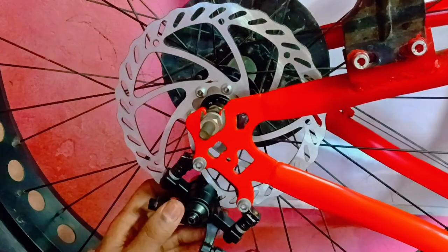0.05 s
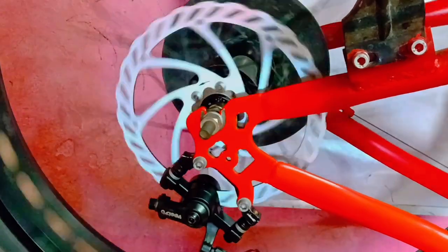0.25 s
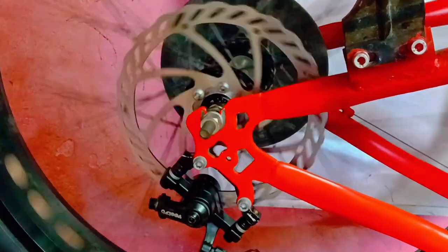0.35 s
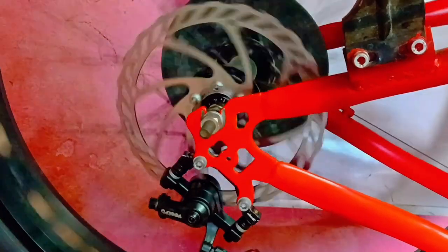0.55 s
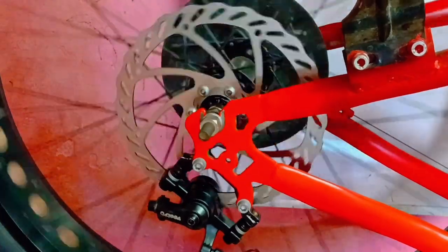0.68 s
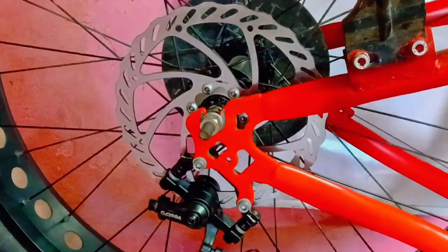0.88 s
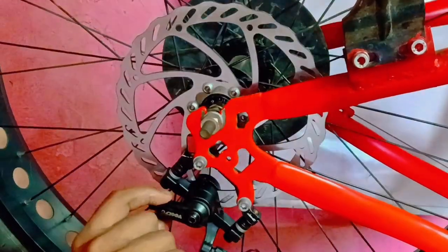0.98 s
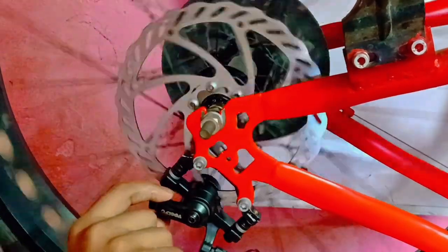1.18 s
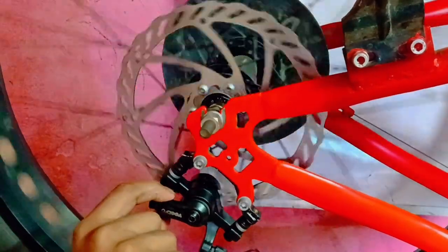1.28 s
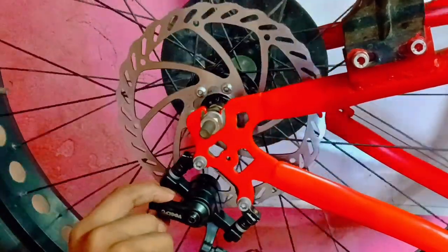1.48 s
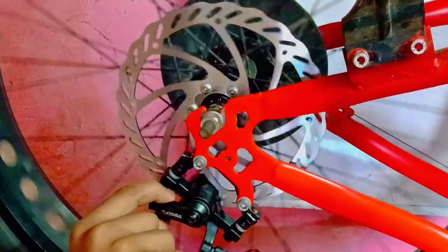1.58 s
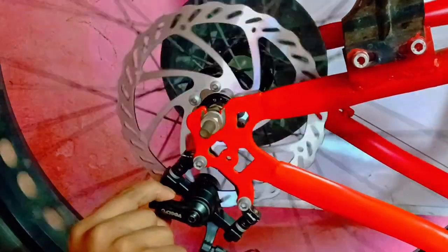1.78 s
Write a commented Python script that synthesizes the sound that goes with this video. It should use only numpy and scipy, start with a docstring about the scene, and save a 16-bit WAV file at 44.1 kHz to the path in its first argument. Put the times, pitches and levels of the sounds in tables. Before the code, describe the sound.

A bicycle disc brake squeaks in short, high, wavering bursts as its pads scrape the spinning disc and click. It lets go briefly, then squeaks and scrapes again more softly, close up in a quiet room.

```python
"""In a quiet room, close to a bicycle, the disc brake is squeezed, let go and squeezed again.
Its pads stick to the spinning steel disc and slip free about 1000-1700 times a second, which makes
short gliding squeaks with bright overtones. In between, the pads scrape grittily, grab with a rasp
and make the disc sing dully. The pads and their clamp (the caliper) click, and once the disc
grazes a released pad with a faint chirp."""
import sys
import numpy as np
from scipy import signal
from scipy.fft import rfft, irfft
from scipy.io import wavfile
from scipy.ndimage import uniform_filter1d

SR = 44100
rng = np.random.default_rng(int(sys.argv[2]) if len(sys.argv) > 2 else 0)


def inscribe(sig):
    """Save sig as 16-bit PCM at rate SR to the path in sys.argv[1].

    A 1-D sig is mono; a 2-D sig holds one channel per row.
    Samples are clipped to [-1, 1] before scaling.
    """
    pcm = np.round(np.clip(np.atleast_2d(sig).T, -1, 1) * 32767)
    wavfile.write(sys.argv[1], SR, pcm.astype(np.int16))


N = 81585

# The tone of the room, the scraping and the clicks. Each row: frequency in Hz, gain in dB.
ROOM_TONE = [(100, -21), (330, -23), (700, -2), (1450, 2), (2000, -5.5), (8000, -18)]
SCRAPE_TONE = [(330, -24.5), (700, -5.5), (1350, 2), (2600, 0.5), (4500, -3), (12500, -5.5), (15500, -5)]
CLICK_TONE = [(250, -40), (700, -24.5), (1350, -4.5), (4500, -8), (6000, -0.5), (8500, -4.5), (11300, -2),
              (15500, -11.5)]
# Light touches that make the disc sing. Each row: start in seconds, end in seconds, level in dB.
LIGHT_RUBS = [(0.4, 0.569, -45), (1.235, 1.272, -42), (1.354, 1.423, -55)]
# How loudly the pads drag on the disc. Each row: time in seconds, level in dB.
SCRAPE_LEVELS = [(.075, -70.5), (.079, -42.5), (.101, -57), (.109, -45.5), (.365, -43), (.382, -57),
                 (.401, -63), (.406, -37), (.48, -45.5), (.56, -41.5), (.76, -50.5), (.82, -68.5),
                 (1.13, -68), (1.16, -43.5), (1.21, -45), (1.27, -37.5), (1.31, -40), (1.33, -63),
                 (1.39, -50.5), (1.495, -70), (1.515, -45), (1.533, -58.5), (1.545, -45), (1.68, -46.5),
                 (1.703, -66.5), (1.728, -68), (1.742, -52.5), (1.85, -52.5)]
# Knocks of the pads and caliper. Each row: start in seconds, level in dB.
KNOCKS = [(.009, -49.5), (0.404, -21), (.415, -22.5), (.448, -28.5), (.499, -36), (0.914, -46.5),
          (0.924, -47), (.983, -57.5), (1.232, -30.5), (1.242, -36), (1.74, -44.5), (1.757, -40.5),
          (1.821, -44)]
# Moments when the pads grab. Each row: start in seconds, ringing frequency in Hz, level in dB.
GRABS = [(0.553, 2130, -33.5), (0.56, 5830, -30.5), (.713, 4800, -42.5), (0.785, 2160, -47.5),
         (1.157, 2460, -37), (1.255, 4500, -32.5), (1.51, 3130, -40), (1.56, 1870, -47.5),
         (1.576, 6360, -37), (1.676, 4160, -46)]
# How the brake rings after a slip, low and high. Each row: frequency in Hz, gain in dB.
LOW_TONE = [(800, -27.5), (1300, -1.5), (2700, 2.5), (4700, 0.5), (5600, -39.5)]
HIGH_TONE = [(3700, -25), (5100, -1.5), (6500, 1), (8000, -7.5), (12000, -14.5), (15500, -25)]
# The squeaks. Each row: low and high ringing frequencies in Hz, gain of the top treble in dB,
# roughness from 0 to 1, and a path. Each row of a path: time in seconds, slips per second,
# level of the low part in dB, level of the high part in dB.
PAD_SQUEAKS = [ (2500, 5800, 11.5, 0.28, [(.226, 1386, -27.5, -26.5), (.234, 1232, -31, -47),
               (.241, 1257, -32.5, -52), (.244, 1337, -30, -20), (.253, 1428, -26.5, -25)]),
               (2310, 7170, 14.5, .16, [(.292, 1280, -22.5, -64), (.297, 1347, -33.5, -18),
               (.308, 1317, -24.5, -16)]), (2310, 6200, 4, 0.46, [(.326, 1190, -28.5, -42),
               (.333, 1238, -32.5, -21.5), (.339, 1258, -24.5, -55), (.360, 1292, -30.5, -37.5),
               (.370, 1354, -42, -58)]), (2930, 6300, -0.5, 0.18, [(.564, 1477, -26.5, -47),
               (.580, 1520, -22.5, -34), (.585, 1679, -30, -24), (.596, 1734, -29, -28),
               (.602, 1510, -25, -45), (.609, 1365, -27, -21.5), (.622, 1466, -28, -22),
               (.634, 1622, -29.5, -13), (.648, 1680, -29.5, -33.5), (.668, 1570, -19, -42),
               (.674, 1372, -26.5, -54), (.683, 1386, -20.5, -54)]),
               (2640, 6690, 5, 0.07, [(.692, 1308, -29, -24.5), (.701, 1313, -30.5, -24)]),
               (2810, 6200, 9, 0.32, [(.715, 1287, -34, -45), (.730, 1300, -32.5, -70),
               (.741, 1311, -36.5, -62), (.755, 1354, -34, -76), (.769, 1277, -46.5, -74),
               (.790, 1190, -46, -69)]), (4200, 7900, 11.5, 0.27, [(1.166, 1343, -43.5, -35),
               (1.183, 1308, -42.5, -71), (1.190, 1350, -38.5, -63), (1.196, 1374, -23, -34),
               (1.200, 1393, -25.5, -53)]), (4060, 7630, -15, 0.42, [(1.219, 1254, -47, -27.5),
               (1.226, 1358, -28.5, -31)]), (4320, 7560, 4.5, 0.23, [(1.262, 1325, -35, -62),
               (1.271, 1324, -40.5, -31), (1.281, 1318, -42.5, -50.5), (1.293, 1315, -41, -35.5),
               (1.318, 1343, -44, -57)]), (3080, 7500, 6.5, 0.87, [(1.515, 1170, -36.5, -33.5),
               (1.524, 1192, -39, -35.5)]), (4800, 7400, 6, 0.46, [(1.540, 1196, -37, -31),
               (1.544, 1170, -38, -49), (1.550, 1226, -46, -41), (1.556, 1138, -32.5, -43),
               (1.562, 1150, -43, -54)]), (4230, 7300, 1, 0.38, [(1.578, 1200, -32, -38),
               (1.595, 1128, -31, -54), (1.600, 1175, -55, -42)]),
               (1860, 6400, -8, 0.3, [(1.652, 971, -36.5, -74), (1.667, 984, -48.5, -50)]), ]


def amp(db):
    """Turn decibels into a number to multiply by."""
    return 10 ** (np.asarray(db) / 20)


def unit(x):
    """Scale a signal so that its typical size (rms) is 1."""
    return x / np.std(x)


def even(x, size=200):
    """Hold the strength near 1 all along, averaging over size samples."""
    power = uniform_filter1d(uniform_filter1d(x * x, size), size)
    return x / np.sqrt(power + 1e-12)


def wander(hz):
    """A smooth random wobble that turns about hz times a second."""
    size = max(int(SR / hz), 1)
    return unit(uniform_filter1d(uniform_filter1d(rng.standard_normal(N), size), size))


def colour(x, points, size=4096):
    """Shape a sound's tone with a table of frequencies and gains."""
    hz, db = np.array(points).T
    freqs = np.maximum(np.arange(size // 2 + 1) * SR / size, 1)
    gain = amp(np.interp(np.log(freqs), np.log(hz), db))
    # these steps make the filter ring only after a sound, never before it
    cepstrum = irfft(np.log(gain))
    cepstrum[1:size // 2] *= 2
    cepstrum[size // 2 + 1:] = 0
    ring = irfft(np.exp(rfft(cepstrum)))
    return signal.fftconvolve(x, ring)[:len(x)]


def band(hz, width_hz):
    """Noise that rings around one frequency."""
    b, a = signal.iirpeak(hz, hz / width_hz, fs=SR)
    return unit(signal.lfilter(b, a, signal.lfilter(b, a, rng.standard_normal(N))))


def gate(t, start, end, rise_s=0.0035, fall_s=0.009):
    """Fade in just before start and out just after end."""
    return np.clip(np.minimum((t - start) / rise_s, (end - t) / fall_s) + 1, 0, 1) ** 2


def room(level_db=-66):
    """The faint, steady hush of the room."""
    return amp(level_db) * unit(colour(rng.standard_normal(N), ROOM_TONE))


def chirp(t, peak_s=0.878, fade_s=0.0094, pitch_hz=6100, fall_hz_per_s=16000, level_db=-54):
    """The disc grazes a released pad: one faint, unsteady, falling chirp."""
    age = t - peak_s
    hz = (pitch_hz - fall_hz_per_s * age) * (1 + 0.026 * wander(hz=886))
    swell = np.exp(-np.square(age / fade_s))
    return amp(level_db) * np.sin(2 * np.pi * np.cumsum(hz) / SR) * swell


def singing_disc(t):
    """Rubbing too light to squeak makes the disc ring dully at its main note."""
    contact = sum(amp(db) * gate(t, start, end) for start, end, db in LIGHT_RUBS)
    return band(hz=1392, width_hz=250) * contact


def scrape(t, grain_db=3, flutter_db=2.5):
    """Tiny bumps on the steel break in a dense crackle that flutters with the disc's surface."""
    grains = rng.standard_normal(N) * amp(grain_db * wander(hz=SR / 10))
    flutter = amp(flutter_db * wander(hz=118))
    loudness = amp(np.interp(t, *np.array(SCRAPE_LEVELS).T))
    return unit(colour(grains * flutter, SCRAPE_TONE)) * loudness


def clicks(t, decay_s=0.005):
    """Short metallic knocks as the pads catch and the caliper shifts."""
    force = sum(amp(db) * (t >= at) * np.exp(-np.abs(t - at) / decay_s) for at, db in KNOCKS)
    crack = rng.standard_normal(N)
    return colour(crack * force, CLICK_TONE) / np.std(colour(crack, CLICK_TONE))


def rasps(t, hold_s=0.0077):
    """The pads grab and chatter unevenly for a moment: a short rasp around one frequency."""
    return sum(even(band(hz, width_hz=0.49 * hz)) * amp(db) * gate(t, at, at + hold_s)
               for at, hz, db in GRABS)


def squeak(t, low_hz, high_hz, top_db, roughness, path, top_hz=8500, lift_db=9, lift_width_hz=426):
    """Each slip of the pads is a pulse; overtones near the brake's two ringing frequencies stand out."""
    times, slip_hz, low_db, high_db = np.array(path).T
    fade = gate(t, times[0], times[-1])
    active = fade > 0
    now = t[active]
    sag = 0.09 * (1 - fade)  # the pitch is lower as the squeak starts and dies
    jitter = roughness * 0.056 * wander(hz=886)
    rate = np.interp(now, times, slip_hz) * (1 - sag + jitter)[active]
    phase = 2 * np.pi * np.cumsum(rate) / SR
    # one puff of grit with every slip
    grit = roughness * 0.29 * (1 + np.cos(phase)) * rng.standard_normal(N)[active]
    harmonics = np.arange(1, 16)[:, None]
    harmonic_hz = harmonics * rate
    high_tone = [(hz, db + top_db * (hz > top_hz)) for hz, db in HIGH_TONE]
    sound = np.zeros(N)
    for ring_hz, tone, db in (low_hz, LOW_TONE, low_db), (high_hz, high_tone, high_db):
        lift = amp(lift_db * np.exp(-np.square((harmonic_hz - ring_hz) / lift_width_hz)))
        slips = unit(sum(lift * np.cos(harmonics * phase) * (harmonic_hz < SR / 2)))
        sound[active] += even(colour(slips + grit, tone)) * amp(np.interp(now, times, db))
    return sound * fade


def scene():
    """All the brake's sounds, heard close up in one channel over the quiet room."""
    t = np.arange(N) / SR
    squeaks = sum(squeak(t, *row) for row in PAD_SQUEAKS)
    brake = squeaks + rasps(t) + chirp(t) + scrape(t) + singing_disc(t) + clicks(t)
    return (brake + room())[None]


def record(dry):
    """Cut away the very highest treble."""
    cutoff_hz = 15600
    return signal.sosfilt(signal.ellip(10, .2, 80, cutoff_hz, fs=SR, output="sos"), dry)


dry = scene()
out = record(dry)
inscribe(out)
```